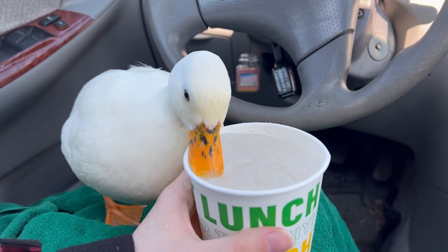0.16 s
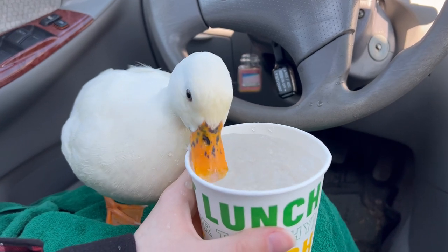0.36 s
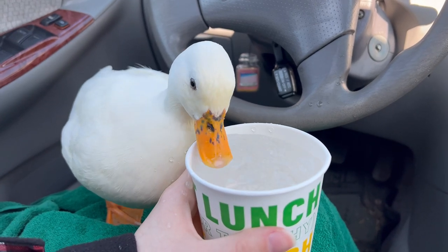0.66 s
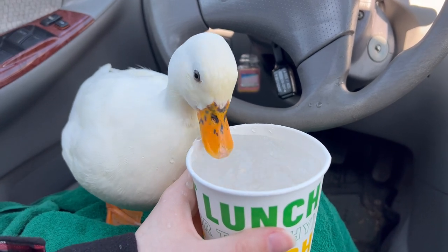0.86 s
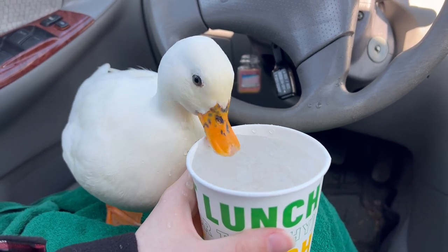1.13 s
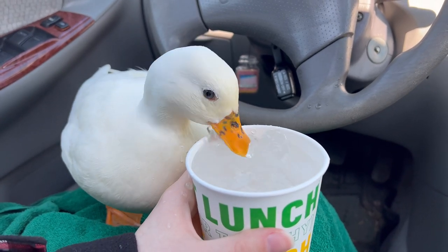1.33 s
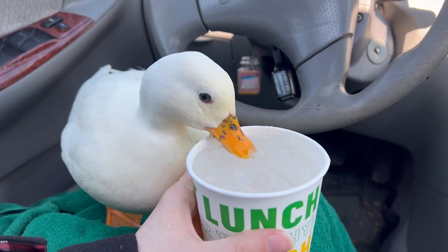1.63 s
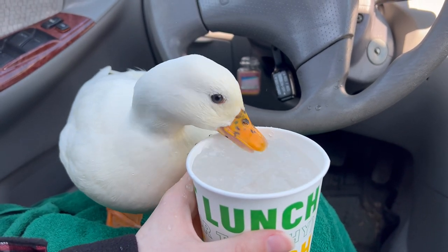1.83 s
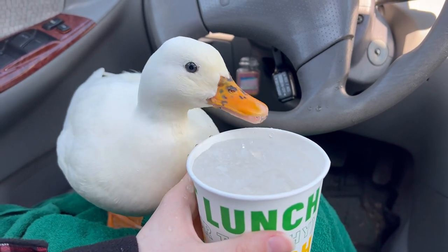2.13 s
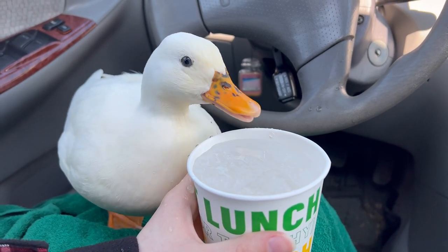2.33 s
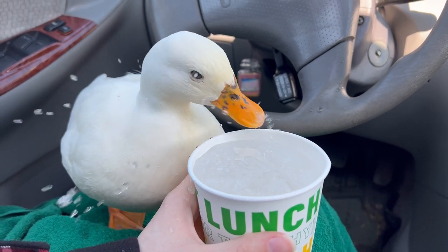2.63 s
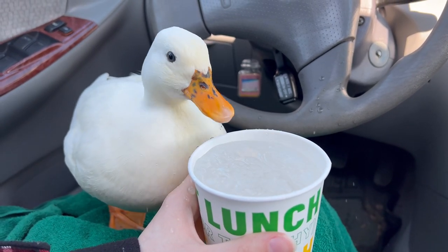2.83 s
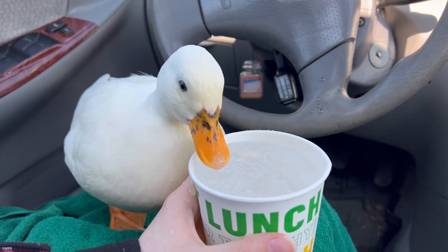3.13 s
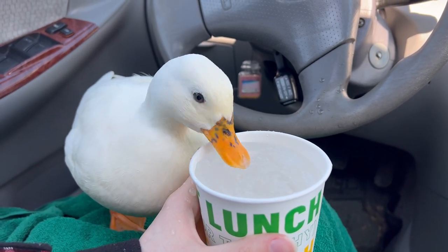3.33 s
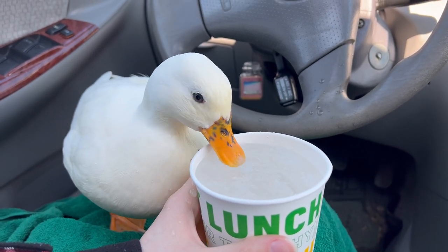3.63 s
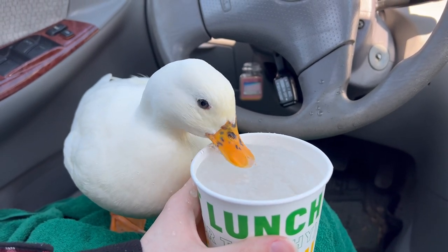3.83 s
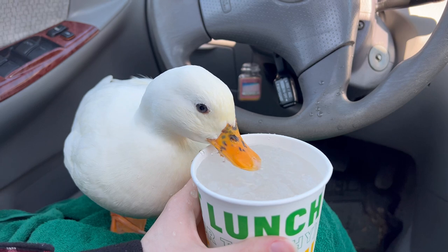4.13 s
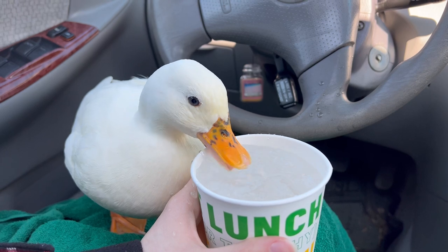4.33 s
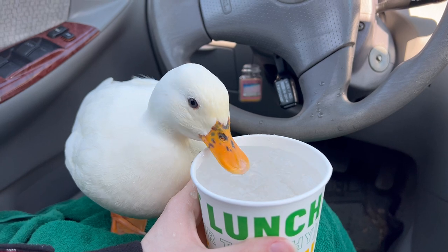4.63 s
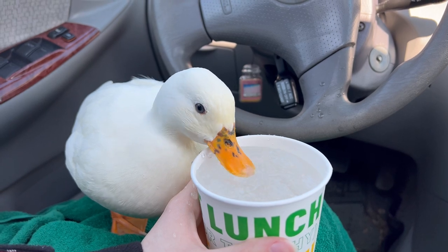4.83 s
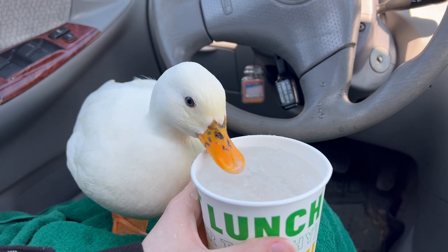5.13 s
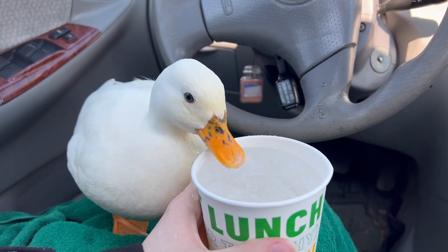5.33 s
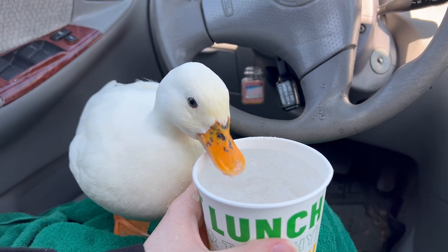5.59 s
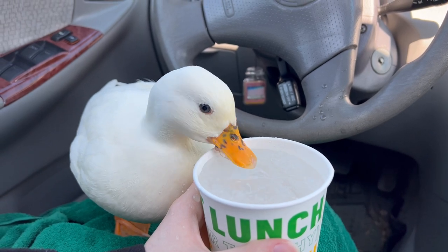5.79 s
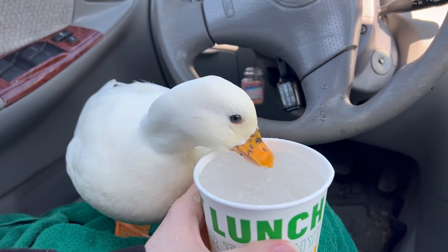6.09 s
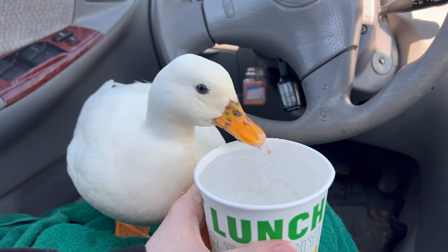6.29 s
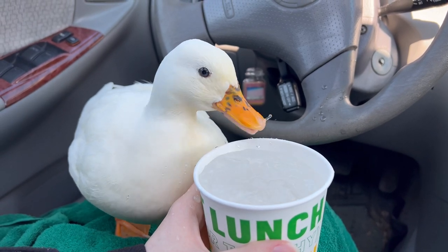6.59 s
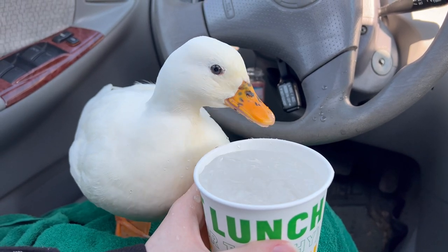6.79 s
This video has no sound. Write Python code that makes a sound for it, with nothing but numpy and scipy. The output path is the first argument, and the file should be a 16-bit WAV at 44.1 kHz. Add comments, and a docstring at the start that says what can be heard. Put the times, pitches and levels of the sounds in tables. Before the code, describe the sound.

A duck dabbles its bill in a paper cup of water, with bubbly blips, slurps and wet clicks over a low idling-car hum.

```python
"""Duck dabbling in a paper cup in an idling car

A duck dabbles its bill in a paper cup of water inside a parked car whose engine idles.
Each quick bite traps air that rings as decaying sines rising in pitch; slurps are a froth of short rings;
wet films snap between the bill halves as noise cracks amid spray; grains of bubbling and spray patter on.
Soft thuds, air hiss and a cabin boom of resonant noise and a low hum lie below.
Two close microphone ports hear the duck with a colour and delay of their own, amid short reflections."""
import sys
import numpy as np
from scipy import signal
from scipy.fft import rfft, irfft, next_fast_len
from scipy.io import wavfile
from scipy.ndimage import uniform_filter1d

SR = 44100
rng = np.random.default_rng(int(sys.argv[2]) if len(sys.argv) > 2 else 0)


def unload_audio(sound):
    """Save the sound as a 16-bit wav file, at the path given as the first command line argument."""
    columns = np.transpose(np.atleast_2d(sound))
    # keep every value between -1 and 1, then stretch to whole-number steps
    steps = np.round(np.clip(columns, -1, 1) * 32767)
    wavfile.write(sys.argv[1], SR, steps.astype(np.int16))


def volts_from_decibels(level):
    """Turn decibel levels (scalar or array-like) into linear amplitude factors."""
    exponent = np.asarray(level, float) / 20
    return 10 ** exponent


N = 306495

# trapped air pockets: t/s, peak level/dB, pitch f/Hz, dull slap of water relative to that peak/dB
POCKETS = [(0.048, -33, 3700, -35), (0.104, -45, 2600, -22), (0.195, -41.5, 2450, -12),
           (0.218, -27.5, 2350, -7.5), (0.273, -34, 2230, -1), (0.331, -38, 2690, -8),
           (0.386, -33.5, 3220, -28), (0.502, -39.5, 2730, -5), (0.597, -50, 1980, 8.5),
           (0.677, -40.5, 2180, -14), (0.764, -52.5, 1400, 10), (0.8, -46.5, 2230, -20),
           (0.852, -48, 1140, -15), (0.924, -40.5, 2280, -22), (0.937, -52, 1040, 14.5),
           (0.993, -40.5, 2300, -26), (1.046, -47.5, 2500, 6), (1.133, -38, 2440, -4.5),
           (1.292, -42.5, 1030, 9.5), (1.362, -37.5, 1290, 2), (1.371, -34, 2480, -23),
           (1.406, -40, 2590, -1), (1.43, -49, 2400, -19), (1.461, -58.5, 980, 18), (1.468, -35, 2640, -23),
           (1.532, -52, 1260, 10), (1.625, -41, 2100, -28), (1.642, -44, 1085, 10.5), (1.786, -53, 1620, 8),
           (1.853, -40, 2200, -20), (1.815, -35, 2640, -23), (1.998, -37.5, 2750, -32),
           (2.123, -27.5, 3230, -16), (2.249, -31, 3270, -26), (2.274, -39, 2880, -17),
           (2.169, -34, 3260, -16), (2.225, -36.5, 3200, -6), (2.983, -43, 2140, 6.5),
           (3.193, -47.5, 2100, -5), (3.234, -53, 1890, 8), (3.391, -51.5, 1150, 13.5),
           (3.453, -46, 2300, -22), (3.48, -31, 2920, -26), (3.526, -44, 2030, -8), (3.555, -61, 2170, 17),
           (3.586, -42, 2860, -24), (3.66, -53, 1600, 4), (3.706, -46, 1040, -5), (3.716, -38.5, 2150, 0.5),
           (3.806, -47.5, 1000, -7), (3.838, -44, 1200, 5.5), (3.864, -45, 1640, 4),
           (3.901, -34, 2360, -3.5), (3.984, -27, 3380, -10), (4.401, -32, 3120, -18),
           (4.43, -42.5, 2570, 3), (4.455, -29.5, 2720, -32), (4.509, -30, 2680, -34),
           (4.52, -27, 2730, -44), (4.57, -36.5, 2340, -23), (4.67, -42, 3500, -22),
           (4.703, -44, 2480, -30), (4.794, -44, 2500, -23), (4.884, -46, 690, 7), (4.915, -33, 2500, -24),
           (4.947, -26.5, 2750, -17), (5.019, -45.5, 2800, -20), (5.079, -42, 3020, -8),
           (5.141, -45, 2140, 2), (5.167, -45, 2650, -2), (5.196, -33, 3660, -23), (5.201, -41, 2380, -6),
           (5.263, -47.5, 1700, 6), (5.332, -39, 3570, -31), (5.429, -49, 2250, -15),
           (5.565, -36.5, 2960, -18), (5.579, -32, 2590, -4), (5.684, -38, 2600, 0.5),
           (5.944, -33.5, 2590, -33), (6.02, -32, 3130, -11), (6.075, -38, 2440, -14),
           (6.262, -33, 3080, -22), (6.583, -41, 3350, -28), (6.755, -52, 1090, 6)]
# wet snaps of the bill: t/s, peak level/dB, pitch f/Hz, drive of the spray around it relative to that level/dB
FILM_SNAPS = [(0.047, -30, 4570, -15), (0.1012, -28.5, 11500, -6.5), (0.1363, -41.5, 5700, 5.5),
              (0.152, -43, 7000, -1), (0.251, -40.5, 5750, -2), (0.329, -27.5, 5160, -7.5),
              (0.3656, -43, 4770, -5), (0.38, -38, 9000, -11), (0.447, -28.5, 11600, -5.5),
              (0.532, -32.5, 5160, -2.5), (0.597, -42.5, 5400, -4), (0.768, -36, 7040, -4),
              (0.828, -33, 8300, -7.5), (0.9932, -21.5, 10800, -40), (1.025, -37, 13000, -6),
              (1.2845, -33, 12400, -9), (1.336, -39.5, 6200, 2), (1.3942, -29, 11400, -23),
              (1.478, -35, 4970, 1), (1.581, -35.5, 11500, -9), (1.627, -28.5, 7900, -15.5),
              (1.817, -45.5, 6340, 10), (1.998, -31.5, 11700, -19), (2.0378, -30.5, 11260, -9.5),
              (2.1208, -29.5, 12200, -10), (2.165, -33.5, 11200, -23.5), (2.225, -31, 14100, -41),
              (2.308, -36, 10800, -33), (2.377, -36.5, 11200, -15), (2.442, -26, 9200, -10),
              (2.4653, -32, 10700, -18), (2.5298, -36, 9200, -3.5), (2.61, -38, 6400, 5),
              (2.6426, -33.5, 13400, -11), (2.669, -43, 12470, 1), (2.72, -41, 10900, -15),
              (2.747, -25.5, 8260, -11), (2.763, -28, 11900, -1.5), (2.814, -37, 4540, -15),
              (2.861, -31.5, 4940, -25), (2.9823, -44, 6800, -0.5), (3.213, -40, 12200, -9),
              (3.2338, -38.5, 7160, -19), (3.266, -33.5, 12200, -9), (3.444, -55, 5300, 0),
              (3.464, -47, 5270, 1), (3.596, -46, 5100, -12), (3.733, -42.5, 5200, -4),
              (3.839, -19.5, 11270, -43), (3.865, -31, 8060, -11), (3.8974, -16.5, 13100, -7),
              (3.917, -34, 7060, 6.5), (3.959, -51, 4640, 7), (3.992, -34, 12700, -32),
              (4.041, -15, 8450, -13.5), (4.099, -42.5, 7100, 5), (4.1405, -48, 4500, 7.5),
              (4.1574, -25, 7640, -17), (4.2195, -31.5, 7900, -10), (4.2506, -45, 7200, 2),
              (4.428, -47.5, 4300, 4), (4.797, -42, 4930, -8), (4.9124, -33, 7300, -21),
              (4.948, -31.5, 4940, -4), (4.9545, -33, 12200, -10), (4.9673, -32, 6700, -8),
              (5.021, -29.5, 11900, -10), (5.082, -47.5, 5200, 7), (5.1176, -34.5, 8800, -6),
              (5.3305, -25.5, 8500, -24), (5.433, -40.5, 7200, -9), (5.563, -34, 8160, -7.5),
              (5.804, -39, 8000, -19), (5.92, -34, 14500, -7), (5.944, -42.5, 5900, 2.5),
              (6.0723, -30, 4300, -6), (6.262, -33, 10400, -8), (6.359, -36.5, 7250, -15),
              (6.433, -54, 5500, -14), (6.5815, -45.5, 5840, 3)]


def rms_one(x):
    """Scale to unit rms."""
    return x / np.sqrt(np.mean(x ** 2) + 1e-20)


def in_time(rows):
    """Columns of a curve, sample by sample."""
    s, *columns = np.transpose(rows)
    return [np.interp(np.arange(N) / SR, s, c) for c in columns]


def at_hz(points, hz):
    """Read a spectrum on a log-frequency axis."""
    f, v = np.transpose(points)
    return np.interp(np.log(hz + 1), np.log(f + 1), v)


def drift(rate_hz):
    """Slow random wander of rms 1: noise through two equal poles at rate_hz, drawn every 40 samples."""
    r = np.exp(-2 * np.pi * rate_hz * 40 / SR)
    noise = rng.standard_normal(N // 40 + 2002)
    slow = signal.lfilter([1], [1, -2 * r, r * r], noise)[2000:]
    return np.interp(np.arange(N) / 40, np.arange(len(slow)), rms_one(slow))


def resonate(x, hz, width):
    """Two-pole resonance, gain 1 on top."""
    r = np.exp(-np.pi * width / SR)
    poles = [1, -2 * r * np.cos(2 * np.pi * hz / SR), r * r]
    return signal.lfilter(np.array([1, 0, -1]) * (1 - r * r) / 2, poles, x)


def resonate_twice(x, hz, width):
    """Two equal resonances in a row, for steeper skirts."""
    return resonate(resonate(x, hz, width), hz, width)


def add(out, s, sound):
    """Mix a short sound in at time s."""
    at = int(max(s, 0) * SR)
    out[at:at + len(sound)] += sound[:max(N - at, 0)]


def hiss(level_db=-63, left_db=2.0):
    """Smooth cabin air noise, unrelated in the two ports; left is raised and right lowered by left_db."""
    # spectrum of the air noise: f/Hz, relative level per Hz/dB
    air_spectrum = [(200, 2), (400, -0.5), (800, -5), (1500, -13.5), (3000, -14.5), (8000, -49),
                    (16000, -23)]
    hz = np.arange(N // 2 + 1) * SR / N
    shape = volts_from_decibels(at_hz(air_spectrum, hz)) * np.minimum(hz / 200, 1) ** 2
    air = rms_one(irfft(rfft(rng.standard_normal((2, N))) * shape, N))
    return volts_from_decibels(level_db) * air * volts_from_decibels([[left_db], [-left_db]])


def boom(firing_hz=26.5, firing_db=-52.5):
    """The idling engine shakes cabin air and panels at random; its firing rate hums with a slight wander."""
    # cabin: t/s, low boom level/dB, upper boom level/dB
    boom_levels = [(0.0, -44.5, -51), (4.0, -43, -54), (6.95, -45, -55)]
    # cabin air: f/Hz, half the bandwidth of each of two resonators in a row/Hz, relative level/dB
    air_modes = [(51.25, 8.7, 0.5), (72.87, 5.6, -3.5), (45.9, 5, -6)]
    # panels: f/Hz, half the bandwidth of each of two resonators in a row/Hz, relative level/dB
    panel_modes = [(144.1, 8, -3), (113.4, 33.3, 0.5), (194, 28.7, -9), (297.6, 62, -15.5)]
    low_db, upper_db = in_time(boom_levels)
    hum = np.sqrt(2) * np.sin(2 * np.pi * firing_hz * np.arange(N) / SR)
    out = volts_from_decibels(firing_db) * hum * volts_from_decibels(drift(5.1))
    # side level relative to mid, then left minus right, both in dB
    for modes, level_db, side_db, balance_db in ((air_modes, low_db, -20., -.8), (panel_modes, upper_db, -11., 1.)):
        white = rng.standard_normal((len(modes), 2, N + SR))
        mid, side = 0, 0
        for (hz, half_width, db), noise in zip(modes, white):
            ringing = resonate_twice(noise, hz, 2.0 * half_width)[:, SR:]  # drop the run-in second
            ringing = volts_from_decibels(db) * rms_one(ringing)
            mid, side = mid + ringing[0], side + ringing[1]
        pair = rms_one(mid) + volts_from_decibels(side_db) * rms_one(side) * [[1], [-1]]
        out = out + volts_from_decibels(level_db) * pair * volts_from_decibels(balance_db * np.array([[.5], [-.5]]))
    return out


def cabin(x, t60_s=0.047):
    """Dense short dull reflections from glass and seats, unrelated in the two ports."""
    t = np.arange(int(.15 * SR)) / SR
    tail = rng.standard_normal((2, len(t))) * volts_from_decibels(-60 * t / t60_s) * (t > .002)
    tail = signal.sosfilt(signal.butter(2, 10000, fs=SR, output="sos"), tail)
    tail = tail / np.sqrt(np.sum(tail ** 2) / 2)
    return signal.fftconvolve(x[None], tail, axes=1)[:, :N]


def ports(x):
    """Body of the phone delays and shades the sound differently on its way to each port."""
    # phase between the ports: f/Hz, lead of the left port/rad
    left_lead = [(0, 0), (450, .8), (650, 4.2), (1150, 6.3), (1900, 6.0), (3000, 8.1), (3600, 9.3),
                 (4200, 9.3), (4600, 6.1), (7900, 5.5), (10000, 3.2), (12700, .2), (14600, -.3),
                 (15800, -2.8)]
    # level between the ports: f/Hz, left minus right/dB
    left_balance = [(100, 0), (600, 6), (2100, 3), (2800, -3), (3400, 0), (3900, 7), (4800, 4), (5900, 10),
                    (7000, 3), (9000, 0)]
    size = next_fast_len(N)
    hz = np.arange(size // 2 + 1) * SR / size
    lead = np.interp(hz, *np.transpose(left_lead))
    # each port takes half the difference
    half = volts_from_decibels(at_hz(left_balance, hz) / 2) * np.exp(.5j * lead)
    return irfft(rfft(x, size) * np.array([half, 1 / half]), size)[:, :N]


def bumps():
    """The duck shifts and bumps lap and cup: soft dull thuds, each a swell of noise in one broad resonance."""
    # thuds: t/s, rms level at the height of the swell/dB, pitch f/Hz, time from height to 1/e/s
    thuds = [(1.858, -45, 67.6, 0.18), (2.864, -37, 53, 0.092), (1.805, -41.5, 130, 0.024),
             (2.716, -54, 467, 0.005), (2.8, -53.5, 300, 0.026), (2.85, -43, 132, 0.015),
             (4.457, -52, 590, 0.0092), (4.515, -50.5, 586, 0.0066)]
    out, t = np.zeros(N), np.arange(-6000, 6000) / SR
    for (s, db, hz, length), noise in zip(thuds, rng.standard_normal((len(thuds), len(t)))):
        thud = rms_one(resonate_twice(noise, hz, hz / 1.8))
        add(out, s + t[0], volts_from_decibels(db) * thud * np.exp(-(t / length) ** 2))
    return out


def grains(spectrum, per_s, q, clump_db, own_db, size_db, count):
    """Random tiny bursts dealt to resonators across a spectrum, clumped in time together and band by band; rms 1."""
    sizes = volts_from_decibels(size_db * np.minimum(rng.exponential(1, N), 3.5)) * rng.choice([-1, 1], N)
    born = rng.random(N) < per_s / SR
    dealt = rng.integers(0, count, N)
    out = 0
    for k, hz in enumerate(np.geomspace(spectrum[0][0], spectrum[-1][0], count)):
        bursts = sizes * born * (dealt == k)
        rung = rms_one(resonate(bursts + 1e-18, hz, hz / q))
        out = out + volts_from_decibels(at_hz(spectrum, hz) + own_db * drift(8.8)) * rung
    return rms_one(out * volts_from_decibels(clump_db * drift(40.6)))


def stirring(settle_db=-13.5, settle_s=0.0058):
    """Small bubbles and fine spray, stirred up by each bite and settling until the next; splashes swell on top."""
    # water stirring between bites: t/s, bubbling level/dB, fine spray level/dB
    stir_levels = [(0.0, -64, -56.5), (0.5, -61.5, -50), (0.67, -60.5, -56), (0.85, -63, -57),
                   (1.35, -58.5, -53), (1.8, -57, -50), (2.0, -62, -57), (2.3, -70, -66),
                   (2.6, -101, -58.5), (2.85, -63, -61.5), (3.13, -71, -76), (3.25, -57.5, -61),
                   (3.85, -65.5, -63), (4.3, -66.5, -60), (4.75, -68.5, -66), (4.95, -66, -55.5),
                   (5.4, -67, -60), (5.9, -60, -56.5), (6.95, -79, -65.5)]
    # splashes, thrown up by a plunge or a shake of the bill:
    # t/s, time from height to 1/e/s, bubbling level/dB, fine spray level/dB
    splashes = [(0.777, 0.031, -59, -56), (2.071, 0.0058, -77, -40), (2.196, 0.0077, -47, -45),
                (3.472, 0.009, -73, -47.5), (5.957, 0.054, -60.5, -51), (6.101, 0.018, -51.5, -48.5)]
    # small bubbles: f/Hz, relative level/dB
    bubble_spectrum = [(700, -10.5), (1250, -4), (1800, -5), (2500, 2.5), (3100, 0.5), (4500, -12)]
    # fine spray: f/Hz, relative level/dB
    spray_spectrum = [(1500, -113), (3500, 12.5), (5000, -7.5), (8500, 4), (11500, 7.5), (14000, 2.5)]
    now = np.arange(N) / SR
    bubbling, spraying = volts_from_decibels(in_time(stir_levels))
    for s, length, bubbling_db, spray_db in splashes:
        swell = np.exp(-((now - s) / length) ** 2)
        bubbling = bubbling + volts_from_decibels(bubbling_db) * swell
        spraying = spraying + volts_from_decibels(spray_db) * swell
    bites = np.sort([0] + [row[0] for row in POCKETS + FILM_SNAPS])
    since = now - bites[np.searchsorted(bites, now, "right") - 1]
    settling = volts_from_decibels(settle_db * (1 - np.exp(-since / settle_s)))
    settling = rms_one(uniform_filter1d(settling, size=250))
    bubbles = grains(bubble_spectrum, per_s=900., q=6., clump_db=2.5, own_db=1.5, size_db=3.8, count=24)
    spray = grains(spray_spectrum, per_s=2500.0, q=5., clump_db=2.8, own_db=2., size_db=3.5, count=14)
    return settling * (bubbling * bubbles + spraying * spray)


def slurps(per_s=450.0, scatter=0.085, size_db=3.0, edge_db=-1.5):
    """Water sucked through the half-closed bill froths into bubbles pitched round that of the bill cavity."""
    # slurps: t/s, length/s, base level of the bubbles/dB, bill cavity at first f/Hz, at last f/Hz
    sucks = [(0.13, 0.036, -45.5, 2300, 2480), (1.087, 0.061, -40.5, 2750, 3170),
             (1.324, 0.065, -45.5, 2650, 2620), (1.829, 0.044, -34, 3530, 3850),
             (1.868, 0.047, -39, 2740, 2200), (1.935, 0.013, -40.5, 2300, 2640),
             (2.024, 0.026, -39, 2580, 2700), (2.046, 0.063, -43, 3000, 3440),
             (2.186, 0.017, -27.5, 3596, 3240), (2.338, 0.055, -43, 3470, 3750),
             (2.435, 0.013, -31, 4270, 4730), (2.525, 0.024, -44.5, 4560, 5000),
             (2.603, 0.015, -40, 4430, 4660), (2.735, 0.026, -43, 4750, 4900),
             (2.855, 0.015, -43, 5130, 5170), (3.261, 0.098, -50.5, 1240, 1320),
             (3.442, 0.03, -38.5, 2000, 2900), (4.446, 0.017, -26, 3330, 4560),
             (4.572, 0.054, -46.5, 2180, 2700), (4.711, 0.023, -39, 2800, 3880),
             (4.766, 0.022, -44, 2200, 3200), (4.809, 0.065, -51, 2330, 2570),
             (5.295, 0.048, -54, 2520, 2170), (5.44, 0.052, -51, 3200, 2100),
             (5.483, 0.055, -45, 2090, 2700), (5.612, 0.05, -46.5, 2090, 3180),
             (5.882, 0.027, -40, 4400, 3660), (5.952, 0.057, -43, 2500, 2970),
             (6.068, 0.052, -42, 2920, 3340)]
    out, t = np.zeros(N), np.arange(700) / SR
    draws = rng.random((len(sucks), 4, 220))
    for (s, length, db, first_hz, last_hz), (wait, high, big, long) in zip(sucks, draws):
        done = np.cumsum(-np.log(wait)) / per_s / length  # share of the slurp gone by at each bubble
        pitch = (first_hz + (last_hz - first_hz) * done) * (1 + scatter * (2 * high - 1))
        edge = edge_db * (2 * done - 1) ** 2  # start and end lie under the middle
        gain = volts_from_decibels(db + edge - size_db * np.log(big + 0.14))
        ring_s = 0.0018 * (0.18 + long)
        for share, f, g, ring in np.transpose([done, pitch, gain, ring_s])[done < 1]:
            tone = np.sin(2 * np.pi * f * t * (1 + 2.6 * t))  # pitch rises
            shape = (1 - np.exp(-t / 0.0009)) * np.exp(-t / ring)
            add(out, s + share * length, g * tone * shape)
    return out


def snaps(crack_s=0.00018, spray_s=0.0028, early_s=0.003, crack_q=0.78, spray_q=0.69, broad_db=-9.5):
    """A film between the bill halves bursts in a brief crack, inside a short swell of droplets of like colour."""
    out, t = np.zeros(N), np.arange(2200) / SR
    body = signal.butter(2, 1200, "high", fs=SR, output="sos")

    def colour(x, hz, q):
        """Broad resonance at the pitch of the snap, over a little of everything above 1200 Hz."""
        return 2 * resonate_twice(x, hz, hz / q) + volts_from_decibels(broad_db) * signal.sosfilt(body, x)

    for (s, db, hz, spray_db), noise in zip(FILM_SNAPS, rng.standard_normal((len(FILM_SNAPS), 2, len(t)))):
        crack = (2.2 + noise[0]) * np.cos(2 * np.pi * hz * t) * t * np.exp(-t / crack_s)
        crack = colour(crack, hz, crack_q)
        spray = colour(noise[1] * t / spray_s * np.exp(-t / spray_s), hz, spray_q)
        add(out, s, volts_from_decibels(db) * crack / np.abs(crack).max())
        add(out, s - early_s, volts_from_decibels(db + spray_db) * spray)
    return out


def gurgles(cycles=6.96, spread=0.24, others_db=-13.5, scatter_s=0.024, swell_s=0.0023, slap_s=0.00041):
    """An air pocket rings amid four quieter ones of similar pitch, each rising in pitch as it surfaces."""
    out, t = np.zeros(N), np.arange(1000) / SR
    dull = signal.butter(2, [600, 1700], "band", fs=SR, output="sos")
    slaps = signal.sosfilt(dull, rng.standard_normal((len(POCKETS), len(t))) * np.exp(-t / slap_s))
    for (s, db, hz, slap_db), draw, slap in zip(POCKETS, rng.random((len(POCKETS), 5, 3)), slaps):
        add(out, s, volts_from_decibels(db + slap_db) * slap / np.abs(slap).max())
        for k, (late, detune, damping) in enumerate(draw):
            other = k > 0  # the first is the pocket itself
            f = hz * (1 + spread * (2 * detune - 1) * other)
            decay = f / cycles * (2 + 2 * damping)  # per second: 1/e within 1.7 to 3.5 cycles
            tone = np.sin(2 * np.pi * f * t * (1 + .03 * (decay * t - 1)))
            shape = np.exp(-decay * t) * (1 - np.exp(-t / swell_s))
            gain = volts_from_decibels(db + other * (others_db - 6.2 * damping)) / shape.max()
            add(out, s + other * (late - .4) * scatter_s, gain * shape * tone)
    return out


def scene():
    """Duck and water close to the ports, cabin all round."""
    duck = gurgles() + slurps() + snaps() + stirring() + bumps()
    reflections = volts_from_decibels(-10) * cabin(duck)
    return ports(duck) + reflections + boom() + hiss()


def band_limit(x):
    """A steep low-pass at the top of the band."""
    return signal.sosfilt(signal.butter(12, 16810, fs=SR, output="sos"), x)


def record(dry):
    """The microphones lose the very top."""
    top = signal.butter(8, 15400, fs=SR, output="sos")
    mix = signal.sosfilt(top, dry)
    return band_limit(mix)


dry = scene()
out = record(dry)
unload_audio(out)
```